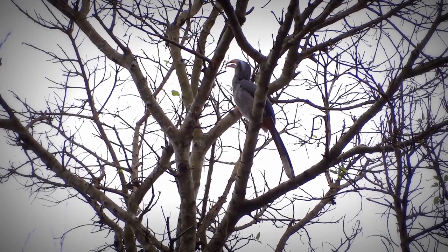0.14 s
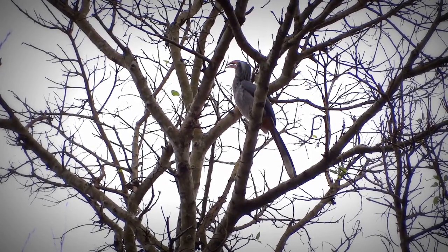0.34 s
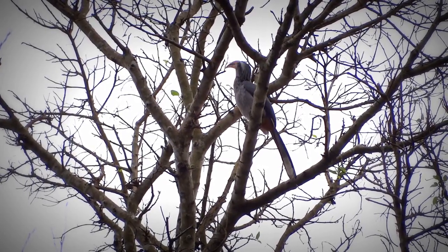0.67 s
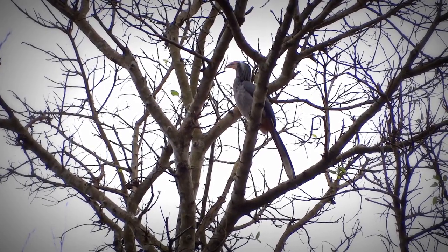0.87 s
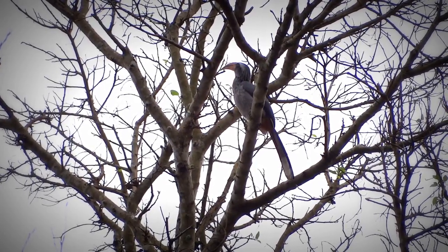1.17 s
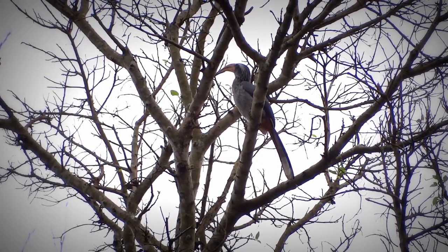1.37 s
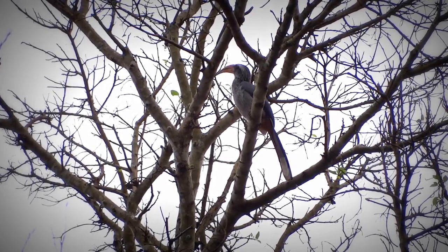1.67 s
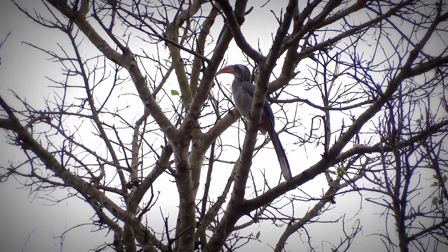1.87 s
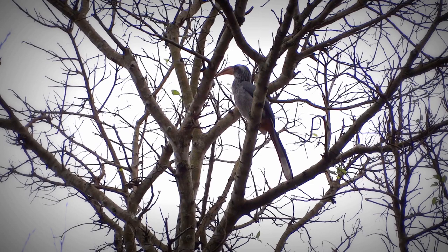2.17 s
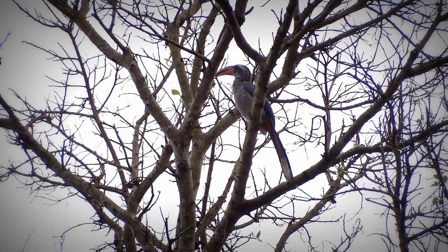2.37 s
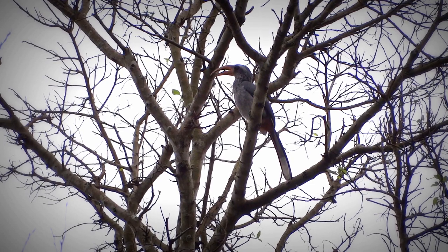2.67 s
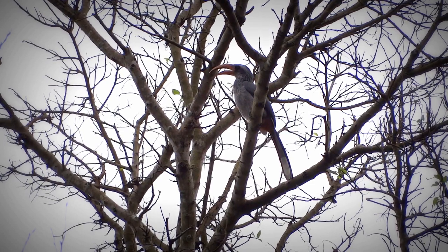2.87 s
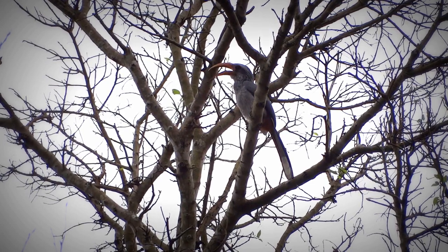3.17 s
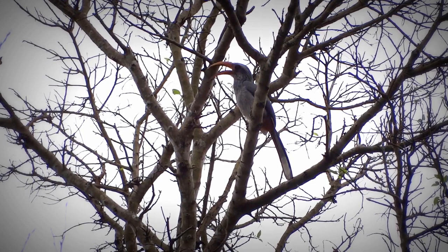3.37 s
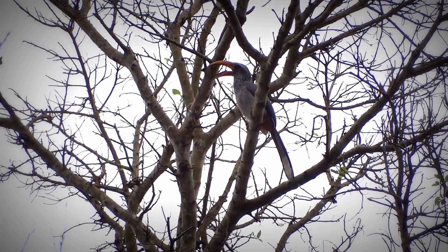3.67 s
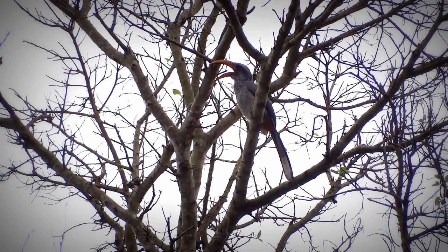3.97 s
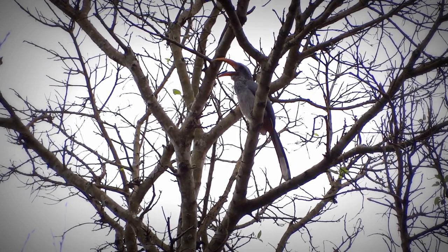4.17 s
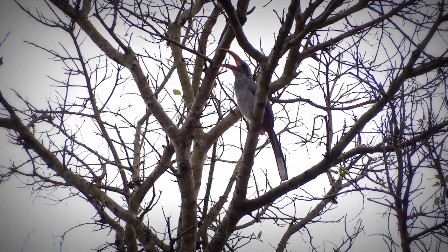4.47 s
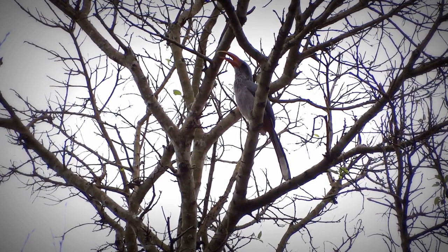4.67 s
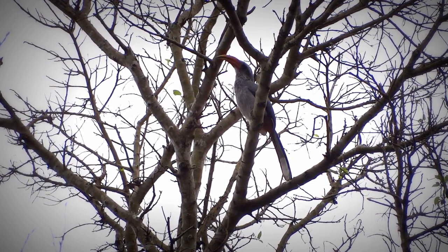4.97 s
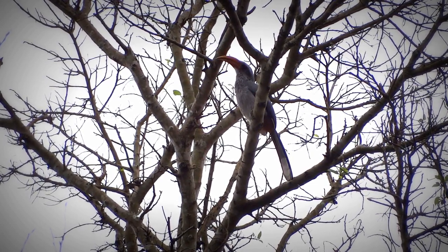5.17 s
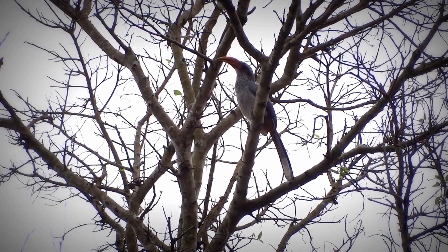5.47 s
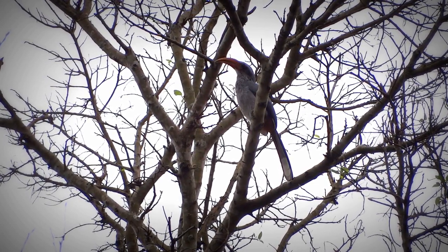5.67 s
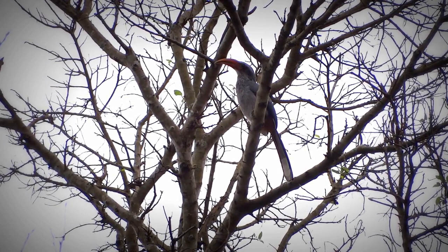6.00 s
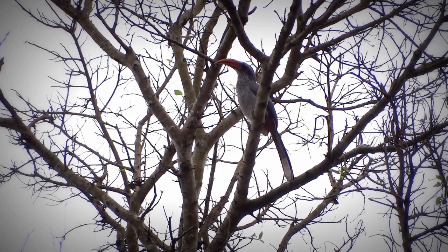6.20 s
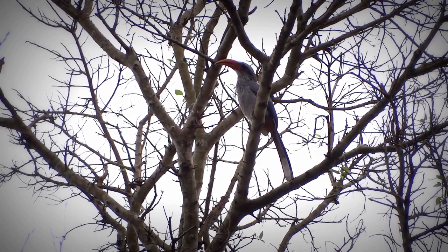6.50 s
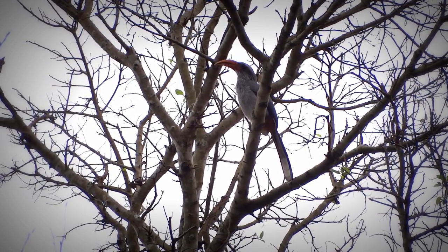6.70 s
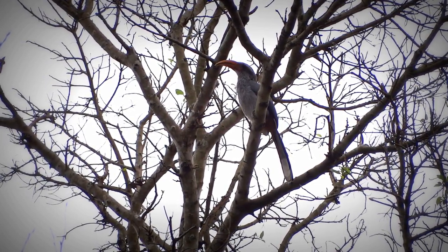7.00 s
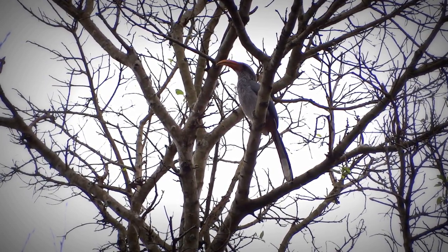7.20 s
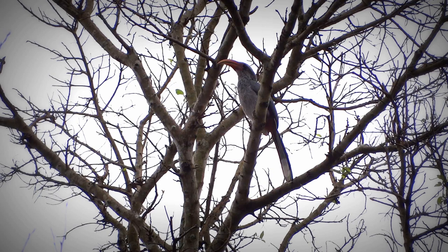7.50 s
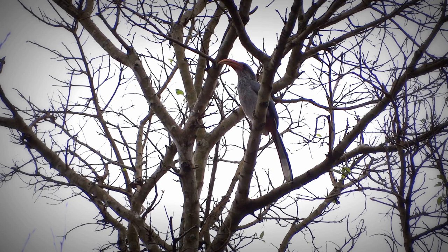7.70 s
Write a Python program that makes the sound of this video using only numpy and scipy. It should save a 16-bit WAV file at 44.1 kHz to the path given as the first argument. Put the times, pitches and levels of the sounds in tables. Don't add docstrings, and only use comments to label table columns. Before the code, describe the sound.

Two harsh nasal squawks from a big perched bird, a sharp bill knock, then distant warbling, chips and soft dove coos outdoors.

```python
import sys
import numpy as np
from scipy import signal
from scipy.fft import rfft, irfft, next_fast_len
from scipy.io import wavfile
from scipy.ndimage import uniform_filter1d

SR = 44100
rng = np.random.default_rng(int(sys.argv[2]) if len(sys.argv) > 2 else 0)


def log_audio(samples):
    frames = np.atleast_2d(samples).T
    limited = np.clip(frames, -1, 1)
    pcm = np.round(limited * 32767).astype(np.int16)
    wavfile.write(sys.argv[1], SR, pcm)


def gain_from_db(level_db):
    decades = np.asarray(level_db, float) / 20
    return 10 ** decades


N = 346185
TIME = np.arange(N) / SR


def unit(x):
    return x / np.sqrt(np.mean(x ** 2))


def shape(hz, points):
    f, db = np.transpose(points)
    return gain_from_db(np.interp(np.log(hz + 1), np.log(f), db))


def colour(x, points):
    return irfft(rfft(x) * shape(np.fft.rfftfreq(len(x), 1 / SR), points), len(x))


def band(x, hz, width_hz):
    edges_hz = [hz - width_hz / 2, hz + width_hz / 2]
    return signal.sosfilt(signal.butter(2, edges_hz, "band", fs=SR, output="sos"), x)


def lift(hz, centre_hz, width_hz, db):
    return db / (1 + ((hz - centre_hz) / width_hz) ** 2)


def walk(rate, size=N):
    hold = max(int(SR / rate), 1)
    steps = np.repeat(rng.standard_normal(size // hold + 1), hold)
    return 1.2 * uniform_filter1d(uniform_filter1d(steps, hold), hold)[:size]


def tone(hz):
    return np.sin(2 * np.pi * np.cumsum(hz) / SR)


def place(x, pan_db):
    return x * gain_from_db(np.array([[pan_db], [-pan_db]]) / 2)


def add(out, s, x):
    i = int(s * SR)
    out[..., i:i + x.shape[-1]] += x[..., :N - i]


def trunks(x, t60, wet_db, side_db):
    t = np.arange(SR) / SR
    decay = np.exp(-np.log(1000) * t / t60) * np.minimum(t / 0.003, 1)
    tails = rng.standard_normal((2, SR)) * decay
    mid, side = (signal.fftconvolve(x, h / np.sqrt(np.sum(h ** 2)))[:N] for h in tails)
    return gain_from_db(wet_db) * (mid + gain_from_db(side_db) * side * np.array([[1], [-1]]))


def track(table):
    s, *columns = np.transpose(table)
    t = TIME[int(s[0] * SR):int(s[-1] * SR)]
    edge = np.minimum(np.minimum(t - s[0], s[-1] - t) / 0.0013, 1).clip(0)
    return s[0], edge, [np.interp(t, s, c) for c in columns]


def note(length, from_hz, to_hz, db, hoarse):
    u = np.linspace(0, 1, int(length * SR))
    flutter = tone(130 + 45 * walk(90, size=len(u)))
    hz = (from_hz + (to_hz - from_hz) * u) * (1 + 0.16 * hoarse * flutter)
    strength = gain_from_db(db + 4.5 * hoarse * walk(172, size=len(u)))
    return strength * np.sin(np.pi * u) ** 0.4 * tone(hz)


# [t/s, f/Hz, level/dB]
CRY_CURVES = [
    [(0.125, 559.6, -59), (0.167, 631.5, -47), (0.2, 666, -42.5), (0.216, 750.6, -46), (0.27, 784.4, -47.5),
     (0.355, 761, -49.5), (0.378, 724, -43.5), (0.44, 628, -46.5), (0.5, 630, -83)],
    [(3.185, 503, -58), (3.21, 544, -57), (3.255, 645.5, -49), (3.296, 738, -46), (3.315, 741.2, -39),
     (3.375, 742, -45.5), (3.415, 700.7, -43), (3.446, 602, -53), (3.49, 563, -78)],
]
BREATH_DB = [-48, -58]
# [partial number, level/dB]
SYRINX_PARTIALS = [(1, -0.5), (3, 4), (4, -3.5), (5, 2.5), (6, 10.5), (7, 6.5), (8, 3), (9, -2), (10, 6)]
# [f/Hz, level/dB]
THROAT_SPECTRUM = [(600, -29), (800, -14.5), (2200, 2.5), (3300, -15.5), (3900, -12.5), (4500, -19),
                   (5200, -23), (9000, -20)]
# [f/Hz, level/dB]
RASP_SPECTRUM = [(900, -11), (1500, 21.5), (2300, 4.5), (4000, 14), (7000, 5.5), (11000, 5), (12000, -95)]


def cries():
    gullet_hz, gullet_width_hz, gullet_db = 1550, 37, 20
    beak_hz, beak_width_hz, beak_db = 2173, 30, 5.5
    second_db = -16
    beat_hz, beat_depth, crest_s = 21, 1.5, .233
    dulling_db_per_s = 18
    rasp_fade_s = 0.074
    out = np.zeros(N)
    for table, rasp_db in zip(CRY_CURVES, BREATH_DB):
        s, edge, (hz, db) = track(table)
        size = len(hz)
        t = np.arange(size) / SR
        phase = 2 * np.pi * np.cumsum(hz * (1 + 0.0018 * walk(122.5, size=size))) / SR
        gullet = lift(2 * hz, gullet_hz, gullet_width_hz, gullet_db)
        voice = gain_from_db(db + second_db + gullet + 1.3 * walk(26.3, size=size)) * np.sin(2 * phase)
        voice *= np.clip(1.8 + beat_depth * np.cos(2 * np.pi * beat_hz * (s + t - crest_s)), .15, 1.5)
        for k, source_db in SYRINX_PARTIALS:
            k = round(k)
            beak = lift(k * hz, beak_hz, beak_width_hz, beak_db)
            flutter = gain_from_db(3.1 * walk(36.6, size=size) + beak)
            effort = gain_from_db(db + source_db - (k > 5) * dulling_db_per_s * t)
            throat = shape(k * hz, THROAT_SPECTRUM) / shape(3 * hz, THROAT_SPECTRUM)
            voice += effort * flutter * throat * np.sin(k * phase)
        rasp = unit(colour(rng.standard_normal(size), RASP_SPECTRUM))
        rasp *= 1 + 0.53 * np.sin(phase)
        breath = np.minimum(np.minimum(t, t[-1] - t) / rasp_fade_s, 1)
        add(out, s, edge * (np.sqrt(2) * voice + gain_from_db(rasp_db) * breath * rasp))
    return out


# [t/s, peak level/dB, ring f/Hz, crack level/dB]
BILL_CLACKS = [(0.098, -31, 1710, -7), (0.116, -9, 2750, -20.5), (0.357, -23, 1620, -6),
               (0.486, -26, 1160, -11.5), (1.35, -48.5, 890, -15), (2.199, -43, 1580, -8),
               (2.271, -43, 1980, -21), (2.306, -48, 1890, -12), (2.325, -49, 2020, -1),
               (2.433, -37, 2210, -16), (2.452, -40, 1960, -14), (2.927, -47.5, 2140, 2),
               (3.017, -47, 1340, -12), (3.71, -40, 1367, -6), (4.911, -42, 2650, -29)]


def clacks():
    out = np.zeros((2, N))
    t = np.arange(-60, 200) / SR
    for s, db, hz, crack_db in BILL_CLACKS:
        swell = np.exp(-np.where(t < 0, 2.2, .9) * (t * hz) ** 2)
        knock = swell * np.sin(2 * np.pi * hz * t + 2.3)
        crack = band(rng.standard_normal(len(t)), 4540, 7150) * np.exp(-np.abs(t) / 0.0046)
        clack = knock + gain_from_db(crack_db) * crack
        add(out, s - .0001, place(gain_from_db(db) * clack, 1.9))
        add(out, s + .0025, place(gain_from_db(db - 16) * clack, 1.2))
    return out


def syllable(length, start_hz, top_hz, end_hz, warble_hz):
    u = np.linspace(0, 1, int(length * SR))
    rise = np.sin(np.pi / 2 * np.minimum(u / .33, 1))
    fall = np.sin(np.pi / 2 * np.maximum(u - .33, 0) / .67) ** 2
    warble = np.cumsum(50 * gain_from_db(3.5 * walk(45, size=len(u)))) / SR % 1 - .8
    hz = start_hz + (top_hz - start_hz) * rise + (end_hz - top_hz) * fall + 2 * warble_hz * warble
    hz = np.maximum(hz, min(start_hz, end_hz) - 60)
    return np.sin(np.pi * u) ** .4 * gain_from_db(2.5 * walk(60, size=len(u))) * tone(hz)


# [t/s, length/s, foot f/Hz, top f/Hz, level/dB]
WARBLED_ARCHES = [(3.175, 0.28, 2814, 3410, -50), (2.767, 0.093, 2940, 3220, -56),
                  (2.893, 0.21, 3020, 3533, -47), (3.079, 0.066, 2620, 3044, -50),
                  (3.634, 0.13, 3000, 3635, -49.5), (3.865, 0.21, 2867, 3476, -49),
                  (4.106, 0.19, 2796, 3450, -50), (4.366, 0.22, 2797, 3373, -48.5),
                  (4.603, .18, 2750, 3224, -47), (4.871, 0.17, 2850, 3400, -51.5)]
# [t/s, length/s, start f/Hz, end f/Hz, level/dB]
PLAIN_PIPES = [(2.611, 0.18, 2350, 3003, -51), (2.628, 0.065, 2270, 2510, -51),
               (3.442, 0.17, 2900, 3160, -48), (3.745, 0.12, 3125, 3160, -50),
               (3.953, 0.042, 2650, 2780, -54), (4.172, 0.16, 3300, 3470, -59),
               (4.235, 0.097, 2710, 3020, -52.5), (4.721, 0.11, 2975, 2786, -50.5),
               (4.857, 0.049, 2710, 2990, -48.5), (4.976, 0.12, 2813, 2670, -50),
               (5.161, 0.15, 2810, 2710, -47.5), (5.34, 0.128, 2680, 2720, -53.5),
               (5.669, 0.089, 2827, 2655, -52.5), (5.778, 0.071, 2630, 2560, -61),
               (6.148, 0.044, 3170, 3130, -56), (6.214, 0.043, 2740, 2604, -54),
               (6.35, 0.024, 2530, 2500, -59)]
# [t/s, length/s, from f/Hz, to f/Hz, level/dB]
QUICK_STROKES = [(5.561, 0.033, 2490, 3000, -51), (5.605, .035, 2810, 3330, -51.5),
                 (5.644, 0.039, 2630, 3100, -54), (6.098, 0.024, 2600, 2970, -51),
                 (6.13, .024, 2700, 3300, -51.5), (6.195, 0.019, 3280, 2900, -52),
                 (6.27, 0.03, 2585, 2500, -64)]


def warbler():
    arch_warble_hz, pipe_warble_hz = 321.7, 70.9
    arch_return = 0.77
    pipe_lift_hz = 111
    out = np.zeros(N)
    for s, length, foot_hz, top_hz, db in WARBLED_ARCHES:
        end_hz = top_hz - arch_return * (top_hz - foot_hz)
        add(out, s, gain_from_db(db) * syllable(length, foot_hz, top_hz, end_hz, arch_warble_hz))
    for s, length, start_hz, end_hz, db in PLAIN_PIPES:
        top_hz = max(start_hz, end_hz) + pipe_lift_hz
        add(out, s, gain_from_db(db) * syllable(length, start_hz, top_hz, end_hz, pipe_warble_hz))
    for s, *voice in QUICK_STROKES:
        add(out, s, note(*voice, 0.16))
    return out


def buzz(factor, db):
    length_s, low_hz, high_hz, rate_hz = .11, 4800, 6950, 210
    u = np.linspace(0, 1, int(length_s * SR))
    swing = tone(rate_hz * gain_from_db(2.5 * walk(150, size=len(u))))
    hz = factor * (low_hz + (high_hz - low_hz) * (1 + swing) / 2)
    lean_db = 4.5 * (u - .4) * swing + 2.6 * walk(199, size=len(u))
    return gain_from_db(db + lean_db) * np.sin(np.pi * u) ** 0.31 * tone(hz)


# [delay/s, length/s, from f/Hz, to f/Hz, hoarseness 0-1]
PHRASE_NOTES = [
    (0, 0.022, 5950, 4770, 0.12),
    (0.025, 0.027, 4950, 5990, 0.37),
    (0.105, .035, 5500, 4000, .5),
]
# [t/s, notes level/dB, buzz level/dB, last note level/dB, pitch factor]
PHRASE_TIMES = [(.8, -44, -47, -45.5, 1.045), (3.277, -43.5, -49.5, -46, 0.95),
                (5.111, -51.5, -51, -51, 1.07), (5.856, -53, -54, -68, 1.07),
                (6.735, -48.5, -46.5, -50, .985)]
# [t/s, length/s, from f/Hz, to f/Hz, level/dB]
UPWARD_SLURS = [(5.327, 0.037, 3400, 4620, -48.5), (5.433, 0.033, 3400, 4360, -47),
                (5.481, 0.07, 3700, 4250, -51), (6.942, 0.027, 3710, 4010, -53.5),
                (6.97, 0.048, 2900, 4470, -47), (6.991, 0.082, 2020, 2810, -61),
                (7.011, 0.026, 4400, 5000, -44.5), (7.781, 0.015, 3900, 4700, -55)]
# [t/s, length/s, f/Hz, level/dB]
SINKING_WHEEZES = [(5.105, 0.096, 4450, -55.5), (5.233, 0.066, 4850, -52), (5.357, 0.074, 4300, -51.5),
                   (5.542, 0.15, 4175, -53.5), (5.656, 0.11, 4270, -58), (5.44, 0.11, 4300, -54.5),
                   (5.88, 0.11, 4400, -61), (6.05, 0.19, 4400, -72), (4.0, 0.38, 4300, -67),
                   (4.5, .3, 4300, -73), (7.034, 0.058, 4200, -46.5), (7.101, 0.11, 4780, -56)]
# [t/s, length/s, f/Hz, level/dB]
LEVEL_CROAKS = [(1.856, 0.17, 1363, -66), (2.38, 0.08, 2116, -56), (2.772, 0.055, 2040, -50),
                (2.861, 0.033, 2100, -47), (3.118, 0.026, 2080, -41.5), (3.125, 0.022, 2600, -46),
                (3.15, .05, 2400, -49), (7.16, 0.085, 2057, -54.5), (7.427, 0.1, 2123, -49.5)]


def small_birds():
    out = np.zeros(N)
    for s, notes_db, buzz_db, last_db, factor in PHRASE_TIMES:
        add(out, s + .012, buzz(factor, buzz_db))
        levels_db = (notes_db, notes_db, last_db)
        for (delay, length, from_hz, to_hz, hoarse), db in zip(PHRASE_NOTES, levels_db):
            add(out, s + delay, note(length, factor * from_hz, factor * to_hz, db, hoarse))
    for s, *voice in UPWARD_SLURS:
        add(out, s, note(*voice, 0.14))
    for table, fall, hoarse in ((SINKING_WHEEZES, 0.88, 0.59), (LEVEL_CROAKS, .99, 0.47)):
        for s, length, hz, db in table:
            add(out, s, note(length, hz, fall * hz, db, hoarse))
    return out


# [t/s, length/s, f/Hz, level/dB]
BUSH_CHIPS = [(1.684, 0.028, 2800, -53), (1.898, 0.083, 593, -66), (1.95, 0.029, 2813, -43),
              (2.016, 0.047, 2320, -63), (2.088, 0.025, 1780, -54), (2.154, 0.037, 1510, -60),
              (2.22, 0.024, 1455, -62)]


def chips():
    out = np.zeros(N)
    for s, length, hz, db in BUSH_CHIPS:
        add(out, s, note(length, hz, 0.95 * hz, db, 0.059))
    return out


# [t/s, peak level/dB, f/Hz]
DOVE_COOS = [(3.286, -68, 750), (3.559, -60.5, 806), (3.732, -56, 778), (3.984, -55, 748),
             (4.415, -65, 788), (4.619, -64, 808), (4.802, -60.5, 798), (5.182, -70, 777),
             (5.456, -59, 774), (5.633, -62, 684), (5.776, -57, 772), (6.029, -53.5, 748),
             (6.149, -57, 746), (6.312, -66, 704)]


def dove():
    out = np.zeros(N)
    for s, db, hz in DOVE_COOS:
        add(out, s, note(0.037, hz, 0.967 * hz, db - 0.5, 0.39))
    return out


# [t/s, f/Hz, level/dB]
HELD_TONE = [(.45, 3890, -69), (.55, 3870, -57), (.67, 3894, -50), (.85, 3835, -62), (.99, 3880, -59)]


def whistle():
    out = np.zeros(N)
    s, edge, (hz, db) = track(HELD_TONE)
    add(out, s, edge * gain_from_db(db + 1) * tone(hz))
    return out


# [t/s, peak level/dB]
TREBLE_BURSTS = [(.19, -43), (.268, -51), (.31, -41), (.378, -50), (.415, -39.5), (.447, -45), (3.33, -52),
                 (3.41, -45), (1.079, -49), (1.4195, -50), (1.81, -47.5), (2.0907, -45), (2.122, -46),
                 (2.229, -52), (2.4234, -60), (2.451, -51), (2.778, -47), (3.012, -46), (3.0977, -44.5),
                 (3.876, -49.5), (4.92, -51), (5.179, -47.5), (7.1377, -47)]


def rustles():
    out = np.zeros(N)
    t = np.arange(3000) / SR
    burst = np.minimum(t / 0.0071, 1) * np.exp(-t / 0.031)
    for s, db in TREBLE_BURSTS:
        add(out, s, gain_from_db(db - 5.5) * burst * rng.standard_normal(len(t)))
    return place(colour(out, [(2000, 2.5), (7000, 2), (8500, 6.5), (11000, -0.5)]), 3.7)


# [t/s, length/s, level/dB]
CAMERA_SCUFFS = [
    (0.963, 0.096, -52),
    (3.395, 0.11, -61.5),
    (6.654, 0.051, -66),
]


def scuffs():
    out = np.zeros((2, N))
    spectrum = [(150, -10), (350, 2), (1200, -3.0), (3000, -7.5), (8000, -25.5)]
    for s, length, db in CAMERA_SCUFFS:
        size = int(length * SR)
        grains = rng.standard_normal(size) * gain_from_db(5.0 * walk(226, size=size)) * np.hanning(size) ** .5
        add(out, s, place(gain_from_db(db) * unit(colour(grains, spectrum)), 2.7))
    return out


def clicks():
    return rng.standard_normal(N) * (rng.random(N) < .06)


# [t/s, level/dB]
CICADA_SWELL = [(0, -91), (.9, -64), (4.2, -65), (5.3, -58.5), (7, -65.5), (7.85, -62)]


def cicadas():
    beat = 1 + 0.12 * tone(56 + 4.1 * walk(2.3))
    swell_db = np.interp(TIME, *np.transpose(CICADA_SWELL)) + 2.2 * walk(9)
    drone = unit(band(clicks() * beat, 6516, 350)) * gain_from_db(swell_db)
    return place(drone, -4.0) + trunks(drone, 0.092, -11.5, 1.3)


# [t/s, peak level/dB]
CRICKET_CHIRPS = [(0.1171, -67), (0.2558, -63), (0.4174, -65), (0.9173, -62), (1.2281, -62), (1.3917, -59),
                  (1.6526, -63), (1.9455, -61), (2.9282, -61), (3.1313, -58.5), (3.2889, -49.5),
                  (3.9714, -62), (4.2423, -59), (4.5022, -58), (4.6713, -62), (4.9057, -67), (5.0744, -62),
                  (5.3472, -66), (6.41, -63), (6.8558, -61), (7.0274, -56), (7.1541, -63), (7.7907, -65)]


def crickets():
    chirps = np.zeros((2, N))
    for s, db in CRICKET_CHIRPS:
        add(chirps, s, gain_from_db([[db - 5.0], [db - 12.0]]) * np.hanning(int(.13 * SR)) ** 0.17)
    low = unit(band(clicks(), 4640, 62)) * chirps[0]
    high = unit(band(clicks(), 5110, 200)) * (chirps[1] + gain_from_db(-71.5))
    return place(low + high, -1.2) + trunks(low + high, 0.12, -19, 0)


# [t/s, level/dB]
WIND_PUFFS = [(0.0, -67), (.55, -67.5), (.82, -58.5), (1.1, -68.5), (4.59, -66.5), (5.99, -58), (6.25, -67),
              (6.54, -53.5), (7.0, -67.5), (7.19, -48.5), (7.37, -67), (7.85, -62.5)]
# [f/Hz, level/dB per Hz]
GUST_SPECTRUM = [(12, -9), (20, -6.5), (82, 2), (144, -8), (172, -9.5), (229, -23.5), (271, -26),
                 (300, -22.5), (390, -25), (660, -120)]


def wind():
    gust_db = np.interp(TIME, *np.transpose(WIND_PUFFS)) + 1.4 * walk(13)
    puffs = unit(colour(rng.standard_normal(N), GUST_SPECTRUM)) * gain_from_db(gust_db)
    stray = gain_from_db(-21) * np.roll(puffs, SR // 10)
    return puffs + stray * np.array([[1], [-1]])


# [f/Hz, level/dB per Hz]
AIR_SPECTRUM = [(59, -42), (100, -6), (220, -8), (285, -9.5), (369, -10.5), (797, -12), (1070, -15),
                (1860, -17), (3180, -16), (3440, -16), (4630, -14), (5530, -19), (6600, -11.5),
                (7890, -21.5), (11300, -19.5), (14600, -81), (22000, -120)]
# [f/Hz, level/dB]
AIR_WIDTH = [(60, 10), (110, -12), (190, -4.5), (340, -1), (600, -0.5), (1070, 0), (1910, -3),
             (3410, -11.5), (6070, -16.5), (10800, -30)]
# [t/s, level/dB, extra treble level/dB]
LEAF_SWELLS = [(0, 1.5, -0.5), (.5, -1, 3.6), (.95, .5, 5.5), (1.4, -1.5, 1.5), (3, 0.24, 1.9),
               (4.2, -0.8, 2.6), (5.5, -0.5, 1.5), (6.3, -2, 2.5), (6.7, -2, 1.5), (7.85, -1, 2.4)]


def air():
    mid = colour(rng.standard_normal(N), AIR_SPECTRUM)
    side = colour(colour(rng.standard_normal(N), AIR_SPECTRUM), AIR_WIDTH)
    gain = gain_from_db(-61.5) / np.sqrt(np.mean(band(mid, 2075, 3850) ** 2))
    s, *swells = np.transpose(LEAF_SWELLS)
    hush_db, hiss_db = (np.interp(TIME, s, db) for db in swells)
    size = next_fast_len(N)
    both = rfft(np.array([mid + side, mid - side]), size)
    octaves = np.log2(np.fft.rfftfreq(size, 1 / SR) + 1)
    out = 0
    for hz in 62.5 * 2 ** np.arange(9):
        overlap = np.maximum(1 - np.abs(octaves - np.log2(hz)), 0)
        pair = irfft(both * overlap, size)[:, :N]
        out = out + pair * gain_from_db(1.2 * walk(1.147) + 2.05 * walk(9) + hush_db + hiss_db * (hz > 3000))
    return gain * out


def scene():
    near, knocks, trill = cries(), clacks(), warbler()
    far, close = small_birds() + dove(), chips()
    birds = place(near, -0.94) + trunks(near, 0.89, -5.5, -12.5)
    birds += knocks + trunks(knocks.mean(0), 0.11, -11.5, -26)
    birds += gain_from_db(-2) * place(trill, .6) + trunks(trill, 0.48, -1, -10) + whistle()
    birds += gain_from_db(-1.5) * place(far, .3) + trunks(far, 0.7, -1.1, -8.5)
    birds += gain_from_db(1.5) * place(close, -8.5) + trunks(close, 0.66, -4, -8)
    return birds + rustles() + scuffs() + cicadas() + crickets() + wind() + air()


def masking(x, below_db=-3.0):
    hz, _, z = signal.stft(x, SR, nperseg=1024, noverlap=768)
    power = np.abs(z.mean(0)) ** 2 + 1e-20
    patch = uniform_filter1d(uniform_filter1d(power, size=4, axis=0), size=5, axis=1)
    patch_db = 10 * np.log10(patch)
    loud_db = 10 * np.log10(np.abs(uniform_filter1d(patch, size=24, axis=0)) + 1e-20)
    around_db = uniform_filter1d(patch_db, size=30, axis=0)
    limit_db = below_db - np.interp(hz, [3000, 4800, 6900, 7400], [5, 0, 0, -.9])[:, None]
    audible = (patch_db - around_db > limit_db) & (patch_db - loud_db > -12)
    spared = (hz[:, None] < 1600) | (hz[:, None] > 10300)
    thinned = z * np.where(audible | spared, 1, .05)
    return signal.istft(thinned, SR, nperseg=1024, noverlap=768)[1][:, :N]


def band_limit(x):
    return signal.sosfilt(signal.butter(12, 11150, fs=SR, output="sos"), x)


def record(dry):
    low_pass = signal.ellip(10, .3, 80, 11080, fs=SR, output="sos")
    mix = masking(signal.sosfilt(low_pass, dry))
    return band_limit(mix)


dry = scene()
out = record(dry)
log_audio(out)
```